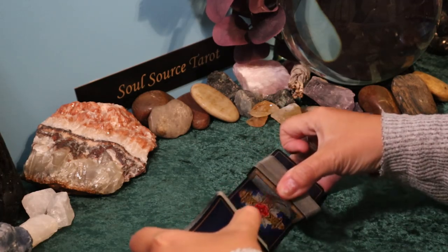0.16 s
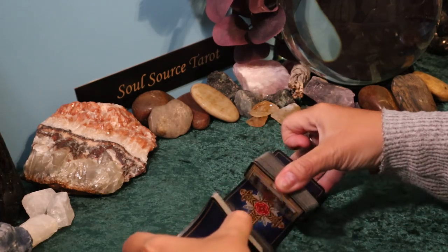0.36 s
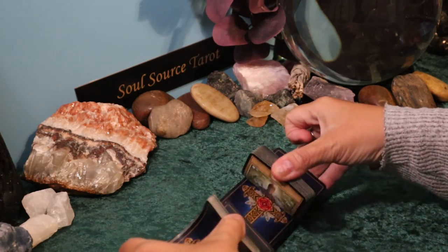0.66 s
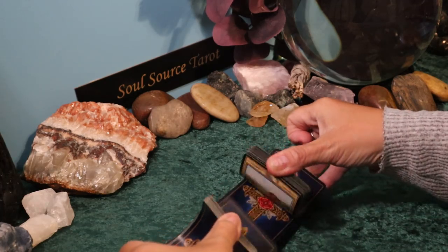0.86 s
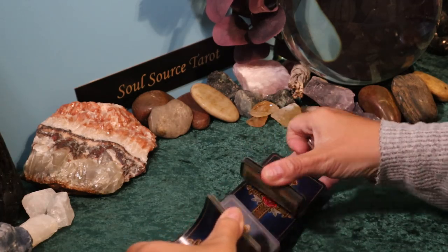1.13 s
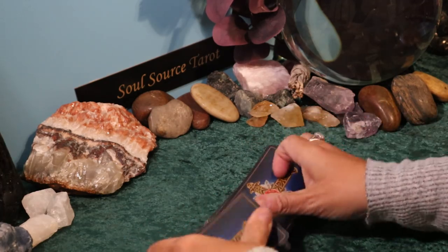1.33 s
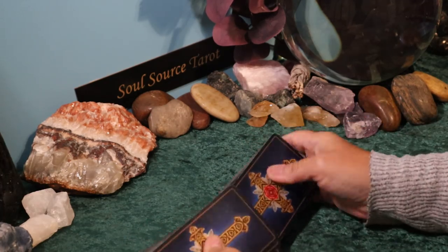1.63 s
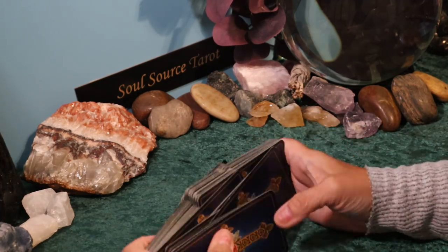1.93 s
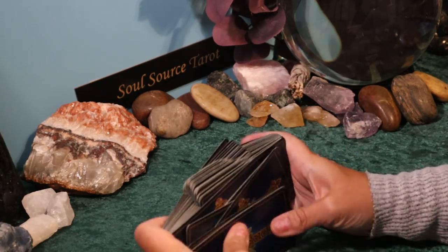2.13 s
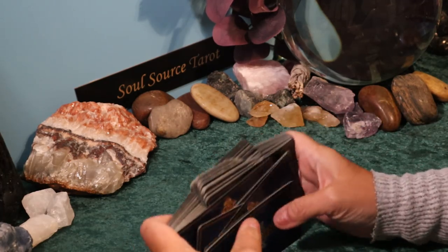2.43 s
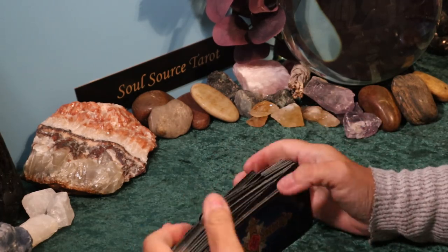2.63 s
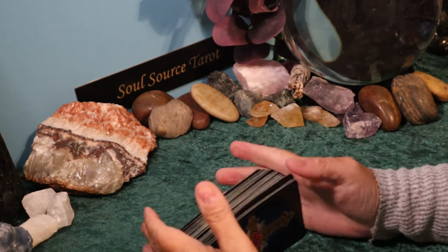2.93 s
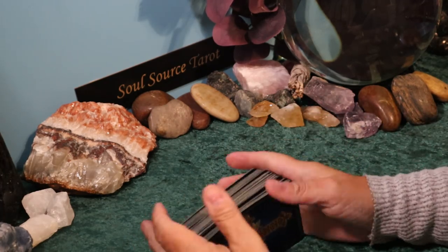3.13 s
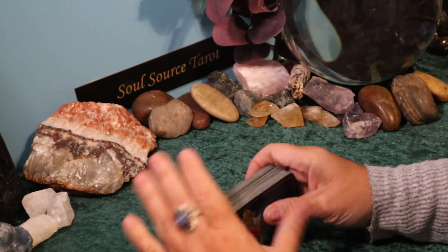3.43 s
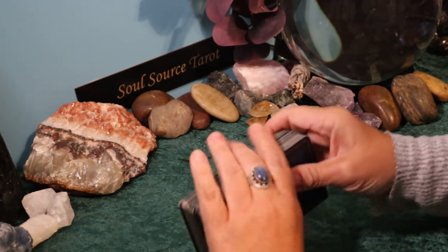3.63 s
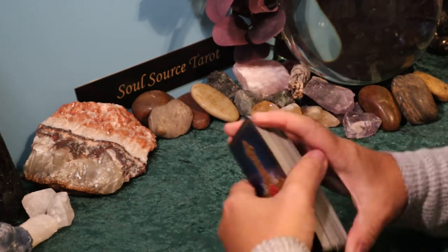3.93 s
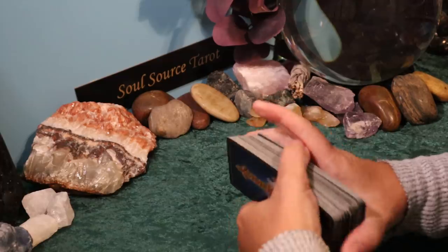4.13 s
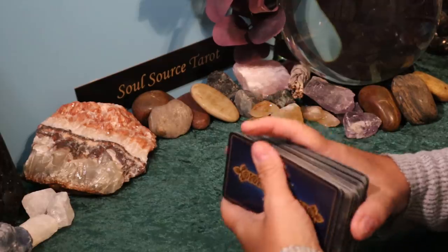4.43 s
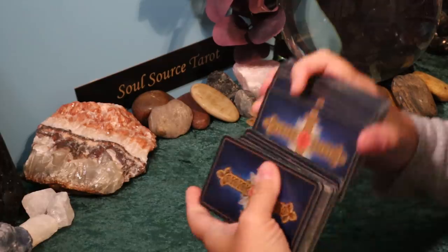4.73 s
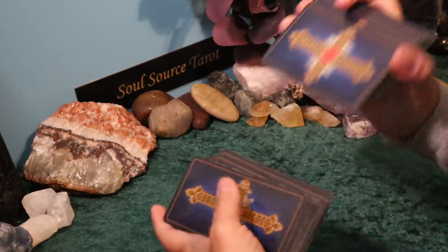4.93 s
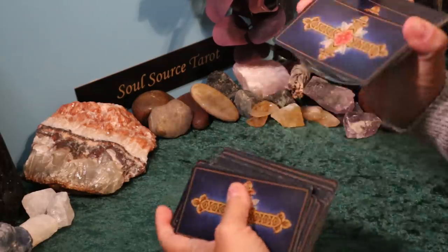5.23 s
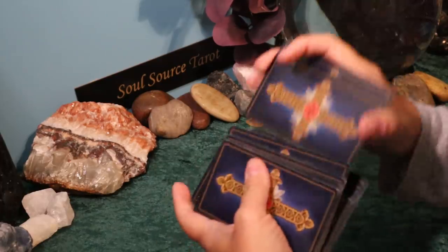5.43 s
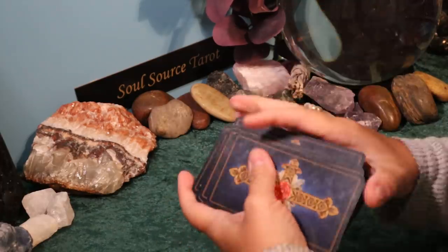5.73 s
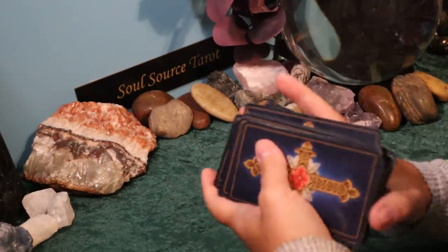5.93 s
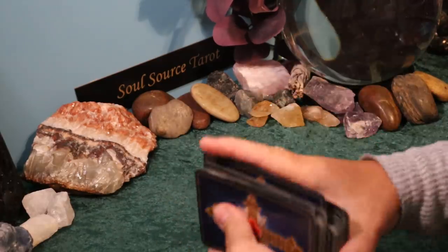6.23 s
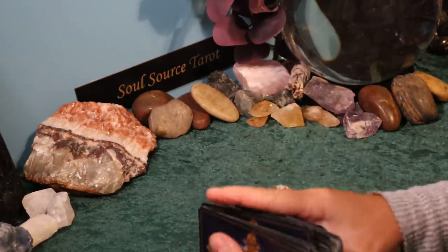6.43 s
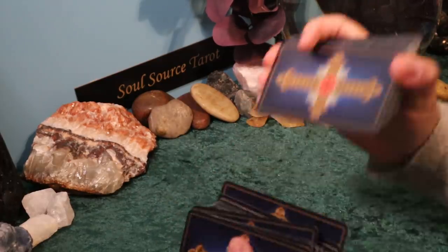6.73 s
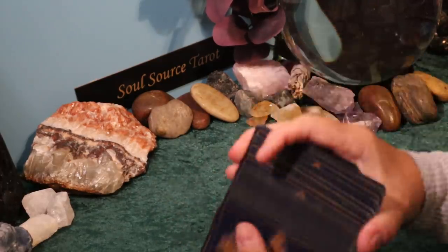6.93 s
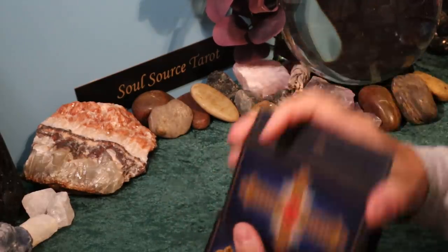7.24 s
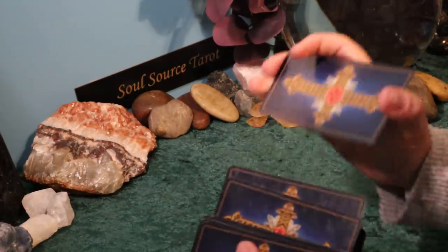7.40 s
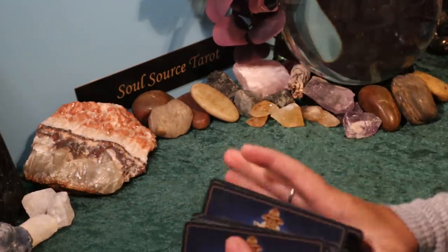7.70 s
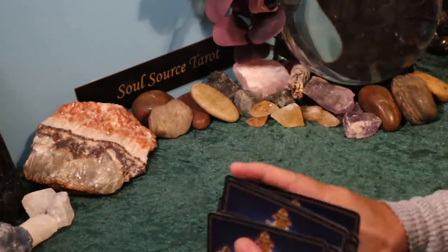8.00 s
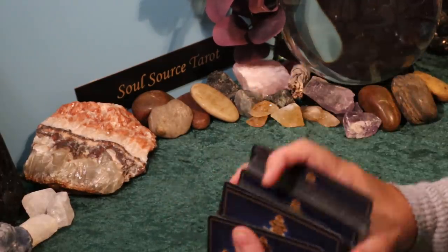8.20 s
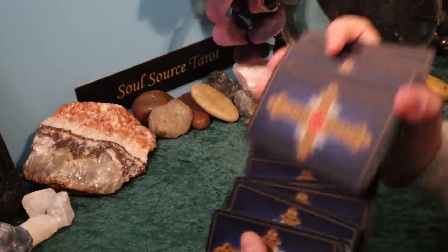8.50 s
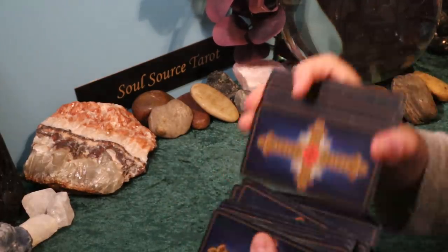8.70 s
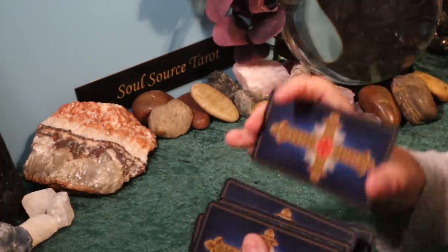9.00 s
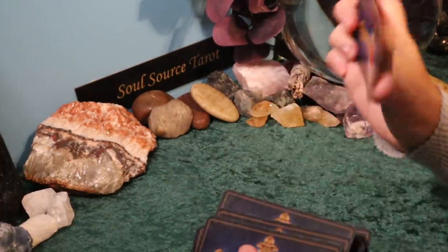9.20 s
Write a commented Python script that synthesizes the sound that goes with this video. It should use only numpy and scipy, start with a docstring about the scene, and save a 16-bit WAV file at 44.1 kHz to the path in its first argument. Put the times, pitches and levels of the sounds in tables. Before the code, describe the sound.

Stiff cards riffle in a loud, uneven crackling burst, get knocked square, then land in irregular slaps from hand to hand in a quiet room.

```python
"""A quiet room with a cloth-covered table: two hands riffle a deck of stiff cards, knock it together, then
drop packets from hand to hand, close to a small stereo microphone, over soft air and a faint low hum.
Riffled cards and landing packets layer an edge crack, a low push of air and a rustle; knocks ring the deck
like a block; slides, drags and brushes are shaped noise. Table levels are those of each dry layer, ahead of
the table boom, stereo, room and gain control."""
import sys
import numpy as np
from scipy import signal
from scipy.fft import rfft, irfft
from scipy.io import wavfile
from scipy.ndimage import uniform_filter1d

SR = 44100
rng = np.random.default_rng(int(sys.argv[2]) if len(sys.argv) > 2 else 0)


def materialize(psi):
    """Save the field psi as 16-bit PCM at rate SR to the path in sys.argv[1].

    A 1-D psi becomes a single channel; in a 2-D psi each row is a channel.
    """
    bounded = np.clip(np.atleast_2d(psi).T, -1, 1)
    quanta = np.round(bounded * 32767).astype(np.int16)
    wavfile.write(sys.argv[1], SR, quanta)


N = 412776


def gain_of(db):
    """Decibels to gain."""
    return 10 ** (np.asarray(db) / 20)


def evened(x):
    """Scales to rms 1."""
    return x / np.sqrt(np.mean(x ** 2) + 1e-20)


def peaked(x, db):
    """Scales to a peak level."""
    return gain_of(db) * x / np.abs(x).max()


def read(points, hz):
    """Reads a table on a log-frequency axis."""
    f, value = np.transpose(points)
    return np.interp(np.log(hz + 1), np.log(f + 1), value)


def add(mix, s, sound):
    """Lays a sound into the mix at a time."""
    part = mix[round(s * SR):][:len(sound)]
    part += sound[:len(part)]


def resonate(x, hz, width):
    """A resonance of gain 1 that follows hz."""
    turn = np.exp(2j * np.pi * np.cumsum(hz * np.ones(len(x))) / SR)
    r = np.exp(-np.pi * width / SR)
    return 2 * (turn * signal.lfilter([1 - r], [1, -r], x / turn)).real


def colour(x, spectrum):
    """Filters by a spectrum with a causal, shortest-ringing (minimum-phase) response."""
    hz = np.abs(np.fft.fftfreq(2 ** 12, 1 / SR))
    log_gain = np.log(gain_of(np.maximum(read(spectrum, hz), -90)))
    taps = np.fft.ifft(np.exp(np.conj(signal.hilbert(log_gain)))).real[:2 ** 10]
    return signal.oaconvolve(x, taps)[:len(x)]


def widened(pair, side):
    """Takes two unrelated sounds as mid and side of what arrives from all around."""
    size = pair.shape[1]
    side_gain = gain_of(read(side, np.fft.rfftfreq(size, 1 / SR)))
    side_part = irfft(rfft(pair[1]) * side_gain, size)
    return pair[0] + np.array([side_part, -side_part])


# Colour of the room air: (frequency [Hz], relative level [dB per Hz])
AIR_COLOUR = [(15, -56.5), (25, -1.5), (116, -1), (221, -16), (289, -6), (410, -15.5), (871, -19.5),
              (2360, -25), (3260, -27.5), (11500, -42), (13200, -45), (15500, -85)]
# Width of the air, nearly mono in the bass: (frequency [Hz], side over mid [dB])
AIR_WIDTH = [(40, -33), (85, -24), (170, -12), (350, -2), (700, 3), (3000, 4), (12000, 6)]
AIR_DB = -49  # rms of the mid


def air():
    """Steady room noise with slight random patches across time and pitch."""
    frames, hz = N // 512 + 5, np.fft.rfftfreq(2048, 1 / SR)
    a, b, c, d, patches = rng.standard_normal((frames, len(hz), 5)).T
    patches = uniform_filter1d(patches, size=20, axis=0)  # smooth over pitch
    patches = evened(uniform_filter1d(patches, size=10, axis=1))  # smooth over time
    level_db = read(AIR_COLOUR, hz)[:, None] + 0.41 * patches
    spectra = np.array([a + 1j * b, c + 1j * d]) * gain_of(level_db)
    noise = evened(signal.istft(spectra, nperseg=2048, noverlap=1536)[1][:, :N])
    return gain_of(AIR_DB) * widened(noise, AIR_WIDTH)


# Distant low tones that swell and sink in pitch:
# (time of the peak [s], rms level at the peak [dB], half-length [s], pitch at the peak [Hz], glide [Hz per s])
HUM_SWELLS = [(4.0, -51, 0.5, 129.8, -5.5), (5.9, -51.5, 0.29, 73.6, -1), (7.35, -39, 0.17, 137.2, -35)]
HUM_HZ, HUM_DB, HUM_WIDTH_HZ = 131, -56, 8


def hum():
    """Noise through a narrow resonance makes a fuzzy tone; gliding sines swell over it."""
    t = np.arange(N) / SR
    out = gain_of(HUM_DB) * evened(resonate(rng.standard_normal(N), HUM_HZ, HUM_WIDTH_HZ))
    for s, db, half, hz, glide in HUM_SWELLS:
        swell = np.sqrt(2) * gain_of(db) * np.exp(-((t - s) / half) ** 2)
        out += swell * np.sin(2 * np.pi * (hz + glide * (t - s) / 2) * (t - s))
    return out


# How long each band rings: (frequency [Hz], time to fall by 60 dB [s])
ROOM_DECAY = [(150, 0.5), (500, 0.39), (1400, .32), (4000, 0.11), (10000, 0.091)]
# Width of the reflections: (frequency [Hz], side over mid [dB])
ROOM_WIDTH = [(60, -26), (300, -11), (700, -4), (1400, -1), (3000, 1), (10000, 4)]


def room(x):
    """Sparse reflections of random sign, each band dying at its own speed; moving hands change the paths."""
    slots = np.arange(24, SR // 2, 16)
    taps = np.zeros((3, 2, SR // 2 + 16))
    at = slots + rng.integers(0, 16, (3, 2, len(slots)))
    np.put_along_axis(taps, at, rng.choice([-1., 1.], at.shape), 2)
    hz, t, z = signal.stft(taps, SR, nperseg=128)
    early = 1 + 2.47 * np.exp(-t / 0.0016)  # table and hands close by answer first
    decay = gain_of(-60 * t / read(ROOM_DECAY, hz)[:, None])
    tail = signal.istft(z * early * decay, SR, nperseg=128)[1]
    # the sound passes round three sets of reflections, 7 turns a second
    turn = 2 * np.pi * (7 * np.arange(N) / SR + np.arange(3)[:, None, None] / 3)
    shares = np.sqrt((1 + np.cos(turn)) / 3)
    wet = signal.fftconvolve(x * shares, tail / np.linalg.norm(tail[0, 0]), axes=2)[..., :N]
    return widened(wet.sum(0), ROOM_WIDTH)


# Phase gap between the microphone ports: (frequency [Hz], lead of the left port [radians])
PORT_PHASE = [(1500, 0), (3000, .4), (5000, 1.3), (7000, 2.1), (15000, 2.2)]
# Level gap between the ports: (frequency [Hz], left over right [dB])
PORT_LEAN = [(300, 0.5), (1000, -1.5), (2500, -5.5), (6000, -2), (12000, 1.5)]


def ports(x, lead):
    """The near sound reaches two ports with pitch-dependent level and phase gaps; lead scales the phase."""
    hz = np.fft.rfftfreq(N, 1 / SR)
    half = gain_of(read(PORT_LEAN, hz) / 2) * np.exp(.5j * lead * read(PORT_PHASE, hz))
    return np.array([irfft(rfft(x) * half, N), irfft(rfft(x) / half, N)])


def strokes(rows, spectrum):
    """Friction: fine hiss with small catches, swelling and fading with each (time, level, swell) row."""
    t = np.arange(0, N, 32) / SR
    power = 0
    for s, db, rise in rows:
        distance = np.where(t < s, (s - t) / rise, (t - s) / (0.65 * rise))  # dies faster than it swells
        power = power + gain_of(2 * db - 40 * distance)
    press = np.interp(np.arange(N) / SR, t, uniform_filter1d(np.sqrt(power), size=20))
    catches = gain_of(2.5 * np.minimum(rng.exponential(1, N), 4))
    catches = catches * (rng.random(N) < 400 / SR)  # about 400 a second
    grain = 1 + 0.26 * signal.lfilter([1], [1, -np.exp(-1 / (0.0014 * SR))], catches)
    return press * evened(colour(grain * rng.standard_normal(N), spectrum))


# Fingertip strokes: (time of the peak [s], level [dB], time to swell by 20 dB [s])
BRUSHES = [(3.85, -58, 0.12), (4.05, -50, 0.1), (4.1, -57, 0.2)]
# Thin high hiss of skin on card edges: (frequency [Hz], relative level [dB per Hz])
BRUSH_COLOUR = [(3000, -20), (7000, -8), (11000, -3), (13000, -6), (15500, -20.5)]


def brushes():
    """Fingertips brush the card edges: friction hiss weighted to the top."""
    return strokes(BRUSHES, BRUSH_COLOUR)


# A card edge or palm dragged over the packet; a swell time of 0 stays silent:
# (time of the peak [s], level ahead of the band [dB], time to swell by 20 dB [s], pitch [Hz])
DRAGS = [(2.93, -38.5, 0.17, 300), (5.958, -40, 0, 4270), (6.52, -48, 0.53, 380),
         (7.753, -42.5, 0.15, 1045), (7.868, -45, 0.17, 1040), (9.213, -36.5, 0.03, 3080)]


def drags():
    """Scrapes of friction noise, each narrowed by a resonance to one fuzzy band."""
    out = np.zeros(N)
    for s, db, rise, hz in DRAGS:
        band = [(hz / 2, -20), (hz, 0), (2 * hz, -20)]
        out += resonate(strokes([(s, db, rise)], band), hz, 0.45 * hz)
    return out


# Card faces sliding on each other: (time of the peak [s], level [dB], time to swell by 20 dB [s])
SLIDES = [(.08, -46, 0.03), (1.891, -54.5, 0.5), (1.971, -34, 0.0829), (2.176, -42.5, 0.19),
          (2.935, -42, 0.13), (3.415, -57, 0.06), (4.849, -53.5, 0.06), (5.175, -32, 0.04),
          (5.235, -37, 0.0155), (6.07, -51.5, 0.27), (6.15, -51.5, 0.3), (6.77, -54.5, 0.31),
          (7.93, -51.5, 0.7), (8.44, -49, .08), (8.667, -57, 0.01), (8.72, -37.5, 0.09),
          (9.108, -44.5, 0.06), (9.215, -48.5, 0.1)]
# Colour of face on face: (frequency [Hz], relative level [dB per Hz])
RUB_COLOUR = [(290, -0.5), (500, -8), (1070, -10), (1670, 2.5), (3960, 0.5), (12000, -4), (15500, -23)]


def slides():
    """Faces rub past each other: broad friction hiss, one swell a stroke."""
    return strokes(SLIDES, RUB_COLOUR)


# The deck knocked against palm or cloth: (time [s], peak level of the ring [dB])
KNOCKS = [(.0655, -17), (.073, -24.5), (.085, -16.5), (.101, -21), (.258, -16.5), (.29, -17.5),
          (.632, -12.5), (1.898, -37.5), (2.54, -22), (2.641, -16), (2.664, -8), (2.677, -10.5),
          (2.697, -11), (2.717, -14), (2.733, -12.5), (2.759, -22), (2.785, -26), (3.168, -34.5),
          (3.65, -31), (6.469, -31.5), (6.662, -40), (6.793, -27)]
# What the block of cards rings with: (frequency [Hz], width [Hz], relative level [dB])
DECK_MODES = [(186, 60, 5), (300, 67, 6), (492, 91, 8), (730, 79, 5.5), (1340, 200, 4), (2100, 400, -2.5)]
# Tick relative to the ring: bent halves first touch down on their corners; later blows land flat
BENT_UNTIL_S, BENT_TICK_DB, SQUARED_TICK_DB = .2, -6, -25


def knocks():
    """A soft, crumbling blow rings the block of cards; a corner landing first adds a short tick."""
    out, t = np.zeros(N), np.arange(2 ** 12) / SR
    for (s, db), noise in zip(KNOCKS, rng.standard_normal((len(KNOCKS), len(t)))):
        blow = np.exp(-t / .0004) + .5 * noise * np.exp(-t / .007)
        softness = signal.butter(2, 2000 * gain_of(.2 * db), fs=SR)  # a lighter blow is softer
        blow = signal.lfilter(*softness, blow)
        ring = np.zeros(len(t))
        for k, (hz, width, mode_db) in enumerate(DECK_MODES):
            ring += (-1) ** k * gain_of(mode_db) * resonate(blow, hz, width)
        tick = resonate(resonate(noise * t * np.exp(-t / 0.0022), 2300, 1800), 2300, 1800)
        tick_db = BENT_TICK_DB if s < BENT_UNTIL_S else SQUARED_TICK_DB
        add(out, s, peaked(ring, db) + peaked(tick, db + tick_db))
    return out


# Colour of a card edge: (frequency [Hz], relative level [dB per Hz])
EDGE_COLOUR = [(410, -26.5), (700, -8.5), (1430, -7), (1850, -4), (2800, -4), (4030, -4.5), (5860, -8.5),
               (11700, -8), (15500, -23)]


def card_edge(x):
    """Gives a noise the colour of a stiff card edge, at rms 1."""
    return evened(colour(x, EDGE_COLOUR))


# Cards cascading: (time [s], level of the ticks [dB])
FLUTTER = [(.22, -67.5), (.25, -33), (.6, -35.5), (.7, -44.5), (.8, -30), (1.1, -33.5), (1.2, -34.5),
           (1.44, -41), (1.52, -53)]


def flutter():
    """Cards fall in quick, uneven succession, each a small dull tick and a low puff."""
    falls = gain_of(3.0 * np.minimum(rng.exponential(1, N), 3))
    falls = falls * (rng.random(N) < 520 / SR)  # about 520 a second
    ticks = rng.standard_normal(N) * signal.lfilter([1], [1, -np.exp(-1 / (0.002 * SR))], falls)
    dull = signal.lfilter(*signal.butter(1, 3000, fs=SR), ticks)
    puffs = gain_of(-6.0) * evened(resonate(ticks, 290, 350))
    level_db = np.interp(np.arange(N) / SR, *np.transpose(FLUTTER), left=-200, right=-200)
    return gain_of(level_db) * (card_edge(dull) + puffs)


RELEASE = 5  # the instant of letting go, against the scrape around it
SING_DB_PER_DOUBLING = 4  # the slower the swell, the purer the gap sings
# Low push under a full-scale edge with a 2 kHz gap; dB it gains per dB of the edge
PUSH_DB, PUSH_GROWTH = -14.5, 0.52
PUSH_DB_PER_OCTAVE = -4.5  # a higher gap means thinner packets and less push


def edge_crack(t, noise, hz, cycles, packet):
    """A card scrapes free and cracks, while the closing air gap rings and sings upward."""
    swell = t * hz / max(cycles, .3)
    closing = swell ** 2 * np.exp(2 - 2 * swell)
    release = RELEASE / max(cycles, 1) * (np.arange(len(t)) == np.argmax(swell > .5))
    rub = 1.5 * closing + 1.0 * np.minimum(swell, 1) * np.exp(-t / 0.0031)
    scrape = release + noise * rub
    song = closing * np.sin(2 * np.pi * hz * t * (.91 + .045 * swell))  # rises as the gap narrows
    song_db = SING_DB_PER_DOUBLING * np.log2(max(cycles, .3) / 3)
    crack = card_edge(signal.lfilter(*packet, scrape))
    ring = gain_of(-3.0) * evened(resonate(scrape, hz, 0.26 * hz))
    return crack + ring + gain_of(song_db) * evened(song)


def air_push(t, hiss, hz):
    """Air pressed out from between the faces thumps in two low resonances."""
    squeeze = hiss * np.exp(-t / .006)
    upper = gain_of(-3.5) * evened(resonate(squeeze, 1.73 * hz, 330))
    return evened(resonate(squeeze, hz, 250)) + upper


def settling_rustle(t, hiss, lumps, hz, gap_db, packet):
    """The packet rustles flat in uneven noise while its air gap keeps singing as it closes."""
    uneven = gain_of(3.2 * evened(uniform_filter1d(lumps, size=130)))
    uneven = uneven * (1 + uniform_filter1d(20. * (lumps > 2.7), size=9))  # single cards catch and tick
    settle = hiss * uneven * (1 - np.exp(-t / 0.00042)) * np.exp(-t / 0.034)
    gap = gain_of(gap_db) * evened(resonate(settle, hz * (1 + 1.5 * t), .14 * hz))
    return card_edge(signal.lfilter(*packet, settle)) + gap


def snaps(rows):
    """Layers an edge crack, a low push of air and a settling rustle for each card or packet."""
    out, t = np.zeros(N), np.arange(2 ** 13) / SR
    chance = rng.standard_normal((len(rows), 3, len(t)))
    for row, (noise, hiss, lumps) in zip(rows, chance):
        s, db, hz, cycles, push_hz, flat_db, rustle_db, gap_db = row
        # a thick packet rings low and cracks dull; no two alike
        band = np.array([0.12, 4.5]) * hz * gain_of(3.0 * lumps[:2])
        packet = signal.butter(2, np.clip(band, 100, 20000), "band", fs=SR)
        edge = edge_crack(t, noise, hz, cycles, packet)
        push = air_push(t, hiss, push_hz)
        push_db = PUSH_DB + flat_db + PUSH_GROWTH * db + PUSH_DB_PER_OCTAVE * np.log2(hz / 2000)
        rustle = settling_rustle(t, hiss, lumps, hz, gap_db, packet)
        add(out, s, peaked(edge, db) + peaked(push, push_db) + peaked(rustle, db + rustle_db))
    return out


# Packets and loose cards landing in the hand:
# (time [s], peak level of the edge [dB], pitch of the air gap [Hz], flatness: change of the push [dB])
LANDINGS = [(1.905, -28, 3210, -7), (2.365, -22.5, 1800, 1), (3.228, -25, 4540, -2),
            (4.877, -35.5, 1160, 1), (5.1241, -17, 1520, 9), (5.1314, -7.5, 1705, -2.5),
            (5.239, -27, 1610, 0.5), (5.473, -18, 1640, 1.5), (5.486, -6, 3660, -3), (5.516, -22, 3580, -9),
            (5.565, -28, 2030, 0), (5.785, -8.5, 3170, -3.5), (5.794, -11, 3070, -5.5),
            (6.509, -40, 1500, -1.5), (7.04, -0.5, 1460, 3), (7.141, -26.5, 1467, -6),
            (7.373, -7.5, 1700, -2.5), (7.431, -15, 2040, 0), (7.477, -21, 1720, -1),
            (7.654, -12.5, 2330, 0), (7.663, -21, 2270, -0.5), (7.683, -16, 3530, 0),
            (7.697, -21, 4000, -3), (8.406, -27.5, 3660, -4), (8.496, -29.5, 1860, -7),
            (8.677, -11, 4250, -9), (8.681, -5.5, 2360, -9.5), (8.716, -24.5, 1010, -4.5),
            (8.754, -23, 2600, -6), (9.032, -12.5, 1770, -4.5), (9.037, -19.5, 896, -5),
            (9.089, -25, 3100, -3), (9.263, -31.5, 1460, -6)]
LANDING_SWELL_CYCLES, LANDING_PUSH_HZ = 2.0, 425
# Rustle under a full-scale landing; dB it gains per dB: light ticks stop short
LANDING_RUSTLE_DB, RUSTLE_GROWTH = -11.5, 0.092
# Singing gap in the rustle at full scale and 2 kHz; a hard landing cups more air, thin packets less
LANDING_GAP_DB, GAP_GROWTH, GAP_DB_PER_OCTAVE = -5, 1.22, -8


def landings():
    """Packets slap into the hand; a flatter landing pushes more air."""
    rows = []
    for s, db, hz, flat_db in LANDINGS:
        rustle_db = LANDING_RUSTLE_DB + RUSTLE_GROWTH * db
        gap_db = LANDING_GAP_DB + GAP_GROWTH * db + GAP_DB_PER_OCTAVE * np.log2(hz / 2000)
        rows.append((s, db, hz, LANDING_SWELL_CYCLES, LANDING_PUSH_HZ, flat_db, rustle_db, gap_db))
    return snaps(rows)


# Riffled cards snapping free of the thumbs: (time [s], peak level of the edge [dB],
# pitch of the air gap [Hz], trailing loose cards over the edge peak [dB], time to swell [cycles])
RIFFLE = [(.231, -20, 2570, 2, 1.4), (.256, -8.5, 3880, -7, 3.7), (.282, -6.5, 3050, -23, 1.7),
          (.306, -0.5, 3080, -7.5, 5.6), (0.3178, 0, 3040, -30, 1.6), (.326, -6.5, 2970, -29.5, 3),
          (.334, -8, 2900, -30, 3.3), (0.3986, 2, 2840, -33, 1.23), (.4055, -15, 3000, -30, 1.5),
          (.416, -1, 4777, -35, 1.5), (.4455, 4, 3660, -33, 1.5), (.465, -6, 2820, -31, 3),
          (.473, -8.5, 1000, -28, .5), (.523, 1.5, 3100, -22, 1.16), (.533, 5, 3920, -18, 0.93),
          (.54, -8, 4500, -30.5, 1.2), (0.5714, -3.5, 3400, -12, 2), (0.6116, -2, 3220, -8, 6.9),
          (.621, -3, 3200, -26.5, 2.2), (0.6437, -1, 3090, -31, 4.48), (0.7437, 6, 3600, -29, 1.18),
          (.7505, -8, 6000, -30, 2), (0.7549, 5.5, 3930, -17, 4.1), (.759, 0, 4320, -30, 1.7),
          (.812, -17.5, 1320, -4.5, 1.5), (.8605, 5, 3220, -33, 1.16), (0.8906, 1, 2760, -33, 6.8),
          (0.9496, -13, 1350, -25, .6), (.9668, 5, 3750, -35, 2.3), (1.004, 0, 3000, -15, 8),
          (1.014, 5, 4080, -18, 6.4), (1.0313, -10, 3100, -20, 2.01), (1.1365, 4, 2690, -33, 1.33),
          (1.19, -17.5, 900, -17, .5), (1.228, -6.5, 2860, -7.5, 3.4), (1.2397, 5.5, 3917, -25.5, 4.8),
          (1.268, -10.5, 2950, -20, 7.5), (1.2873, -2, 2940, -13, 5), (1.3346, -5, 2804, -12.5, 8),
          (1.3431, -9, 2100, -17, 3.98), (1.398, 2.5, 3370, -9.5, 1.8), (1.435, -9, 2360, -17, 4.1)]
RIFFLE_PUSH_HZ, RIFFLE_GAP_DB = 334, -7
RIFFLE_SAG_DB_PER_S = -4.5  # the halves lose their bend, so later cards push less air
SLAP_CYCLES = 4.2  # from this swell on, a card slaps face-on from the right-hand half


def riffle():
    """Bent cards snap off the thumbs; returns the left-hand and right-hand halves."""
    left, right = [], []
    for s, db, hz, trail_db, cycles in RIFFLE:
        sag_db = RIFFLE_SAG_DB_PER_S * (s - 1)
        half = left if cycles < SLAP_CYCLES else right
        half.append((s, db, hz, cycles, RIFFLE_PUSH_HZ, sag_db, trail_db, RIFFLE_GAP_DB))
    return snaps(left), snaps(right)


LEFT_LEAD, RIGHT_LEAD = 0.88, -0.82  # share of the port phase: left half, and all that sounds further right


def near_body(x):
    """Deep bass below 85 Hz is cut from the near sound; the table top booms under the cloth."""
    x = signal.lfilter(*signal.butter(2, 85, "high", fs=SR), x)
    return x + gain_of(-6.0) * resonate(x, 300, 80)


def scene():
    """Cards near the microphone, their room, the room air and the hum."""
    left, right = riffle()
    left = near_body(left + flutter())
    right = near_body(right + landings() + knocks() + slides() + brushes() + drags())
    near = ports(left, LEFT_LEAD) + ports(right, RIGHT_LEAD)
    return near + gain_of(-6.5) * room(left + right) + air() + hum()


def record(dry):
    """Gain control leans back as the averaged level passes a threshold; peaks clip; then the band limit."""
    keep = np.exp(-1 / (.15 * SR))  # 0.15 s averaging, so it recovers slowly
    power = signal.lfilter([1 - keep], [1, -keep], (dry ** 2).mean(0))
    power_db = 10 * np.log10(power + 1e-12)
    duck_db = 0.12 * np.maximum(power_db + 36.0, 0)  # dB of cut, from -36 dB up
    ducked = np.clip(dry / gain_of(duck_db), -1, 1)
    band_limit = signal.firwin(511, 15550, window=("kaiser", 9), fs=SR)  # treble ends at 15550 Hz
    return signal.oaconvolve(ducked, band_limit[None], "same")


dry = scene()
out = record(dry)
materialize(out)
```